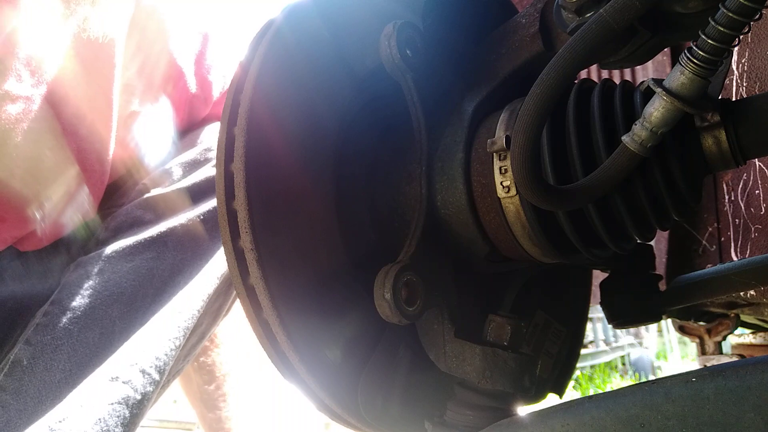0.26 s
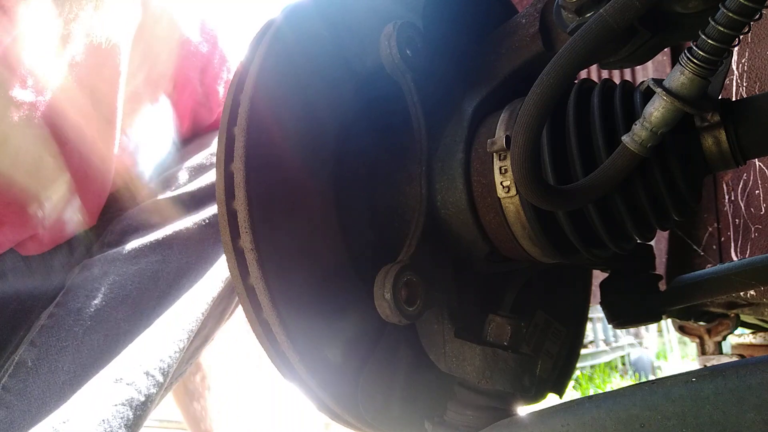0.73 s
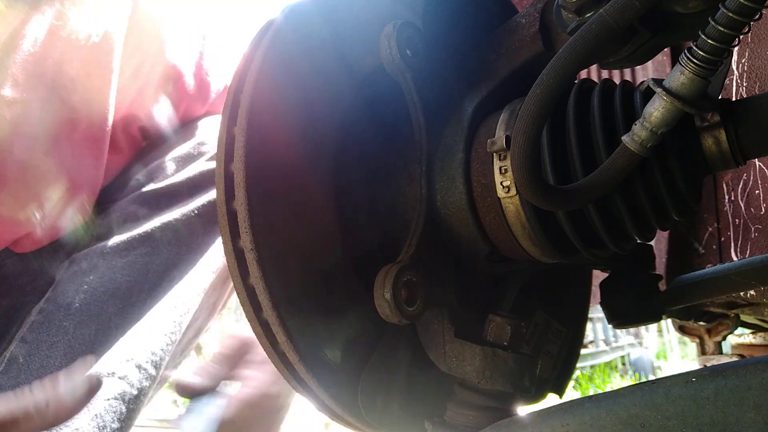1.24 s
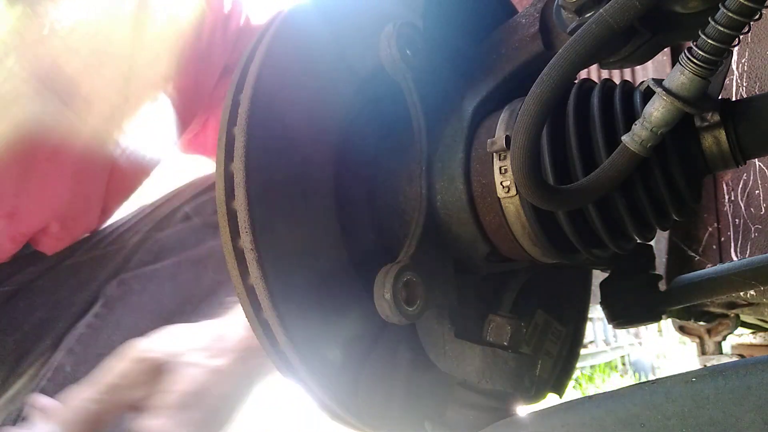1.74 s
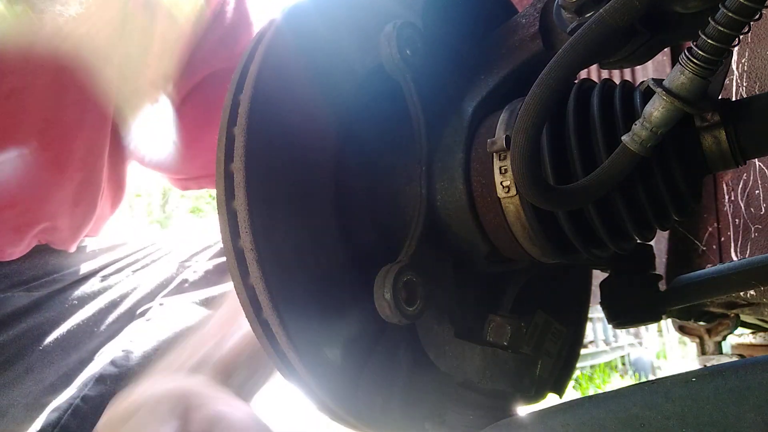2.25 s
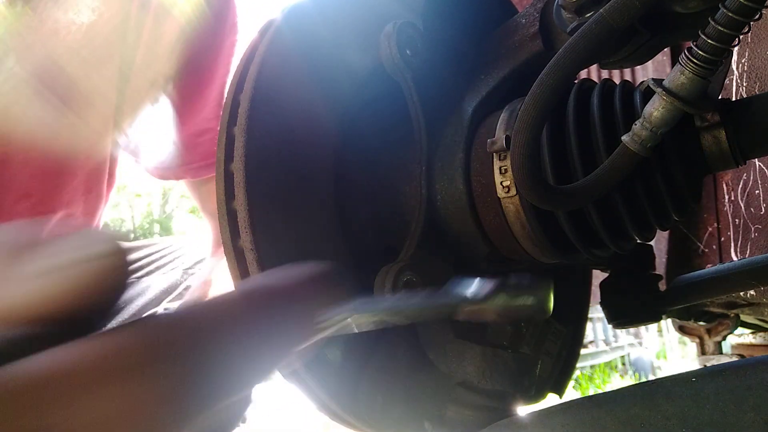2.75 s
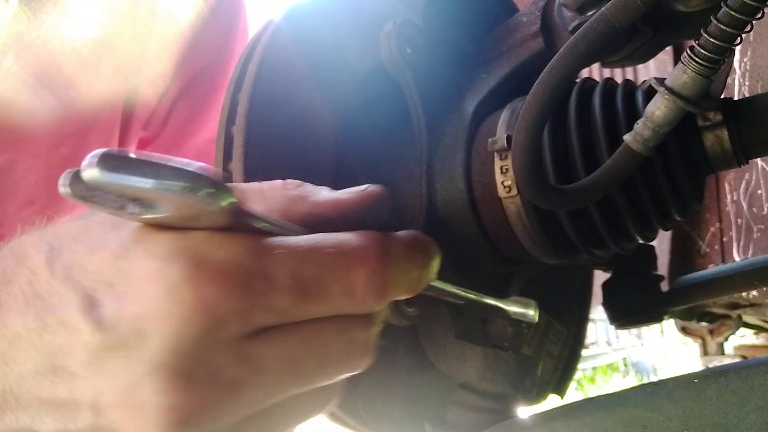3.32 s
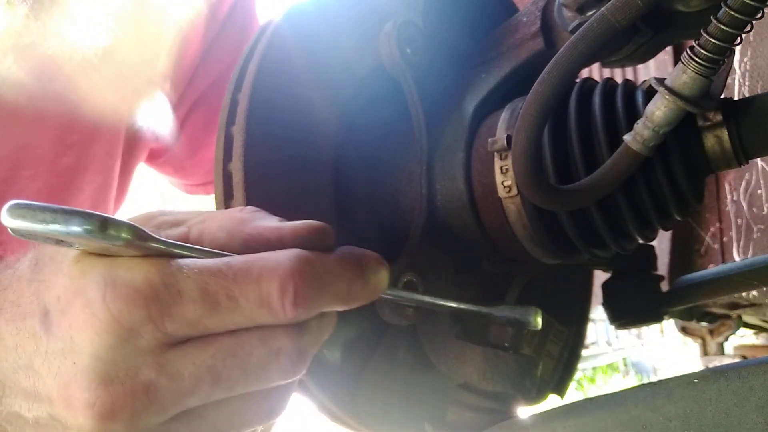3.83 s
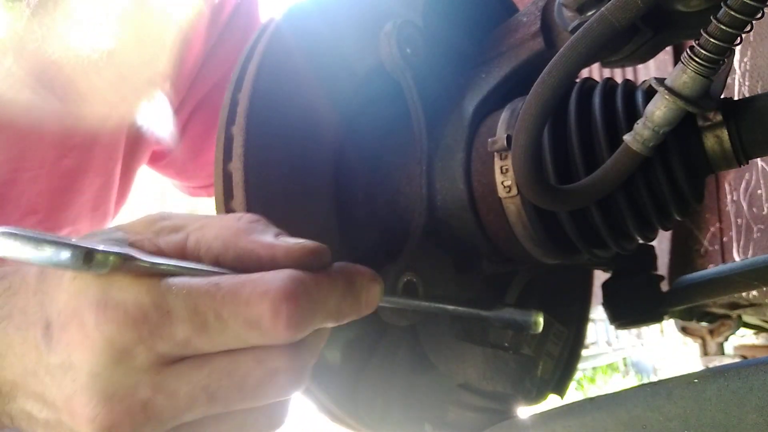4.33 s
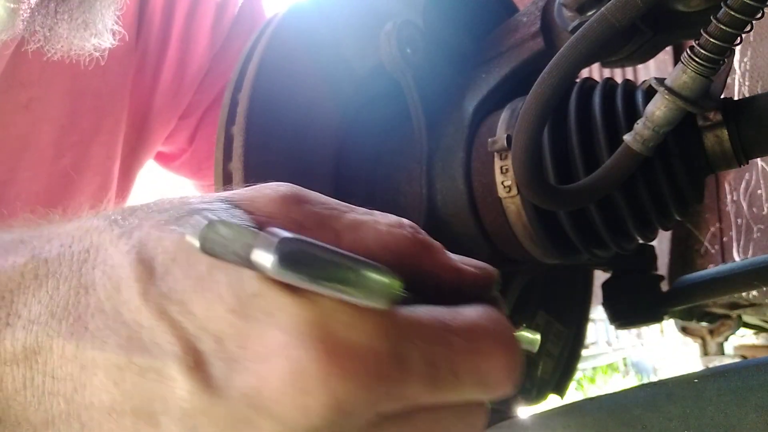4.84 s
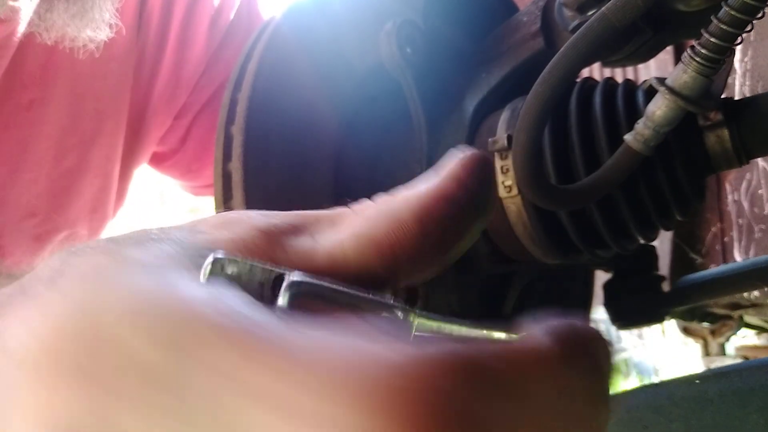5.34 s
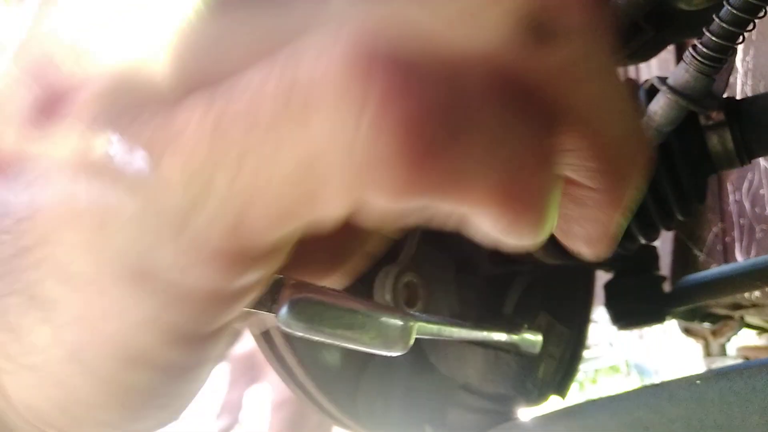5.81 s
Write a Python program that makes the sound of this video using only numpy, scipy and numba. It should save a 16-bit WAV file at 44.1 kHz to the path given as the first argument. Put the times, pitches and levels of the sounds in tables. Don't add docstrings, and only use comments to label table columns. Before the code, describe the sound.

Small tool taps and a quick ratchet whirr, then metal clanks, rasps and ringing knocks on a car hub over faint traffic and birds.

```python
import sys
import numpy as np
from scipy import signal
from scipy.fft import rfft, irfft, next_fast_len
from scipy.io import wavfile
from scipy.ndimage import uniform_filter1d
from numba import njit

SR = 44100
rng = np.random.default_rng(int(sys.argv[2]) if len(sys.argv) > 2 else 0)


def undo_db(level):
    steps = np.asarray(level, float) / 20
    return 10 ** steps


def wrap_up_sound(samples):
    columns = np.atleast_2d(samples).T
    tamed = np.clip(columns, -1, 1)
    steps = np.round(tamed * 32767).astype(np.int16)
    wavfile.write(sys.argv[1], SR, steps)


N = 267951
EARS = np.array([1, -1])
BANDS_HZ = 280 * 2 ** np.arange(0, 5.8, .5)


def colour(x, points):
    hz, db = np.transpose(points)
    size = next_fast_len(x.shape[-1])
    f = np.fft.rfftfreq(size, 1 / SR) + 1
    weight = undo_db(np.interp(np.log(f), np.log(hz), db))
    y = irfft(rfft(x, size) * weight, size)[..., :x.shape[-1]]
    return y / np.sqrt(np.mean(y ** 2))


def play(tables, silent):
    t = np.arange(N) / SR
    out = np.tile(np.array(silent, float)[:, None], N)
    for table in tables:
        s, *columns = np.transpose(table)
        on = (t >= s[0]) & (t <= s[-1])
        out[:, on] = [np.interp(t[on], s, c) for c in columns]
    return out


def held(start, end, db, attack, release, edge_db):
    full, falls = start + attack, max(end - release, start + attack)
    return [(start, db + edge_db), (full, db), (falls, db), (end, db + edge_db)]


def walk(rate):
    k = int(SR / rate)
    steps = np.repeat(rng.standard_normal(N // k + 1), k)
    return uniform_filter1d(uniform_filter1d(steps, k), k)[:N]


def grit(size, spread_db):
    return rng.standard_normal(size) * undo_db(spread_db * rng.standard_exponential(size) - spread_db)


def ports(size, alike, spread_db):
    return np.sqrt(alike) * grit(size, spread_db) + np.sqrt(1 - alike) * grit((2, size), spread_db)


def lean(hz, left_db):
    return np.interp(np.log(hz), np.log([200, 2000, 7000, 13000]), left_db)


@njit
def ring(x, pole, gain):
    out = np.zeros((2, len(x)))
    for m in range(len(pole)):
        z = 0j
        for i in range(len(x)):
            z = z * pole[m] + x[i]
            out[0, i] += (gain[0, m] * z).imag
            out[1, i] += (gain[1, m] * z).imag
    return out


HUB_LAG = -20
# f/Hz, left lead/rad, left minus right/dB
HUB_PORTS = [(764, 0.2, 3), (969, -0.1, 16), (1120, 1.4, 9), (1378, -1.1, 8), (1486, 0.6, -5),
             (1615, -2.3, 2), (1717, -0.1, 2), (1852, -1.8, 9), (1960, 1.5, 8), (1997, -2.4, 7),
             (2116, -2.2, 9), (2374, 0.2, 0), (2525, 1.3, 1), (2686, -0.5, 2), (2805, -0.2, 5),
             (3025, 0.8, 12), (3284, 0.2, 6), (3397, 1.1, 1), (3634, -2.4, 9), (4016, -1.6, 1),
             (4387, 1.2, 19), (4506, -0.1, 17), (4990, -0.7, 10), (5039, 0.8, 3), (5254, 1.1, 9),
             (5529, 2.8, 8), (5755, 0.3, 6), (7154, -0.0, 4), (1647, -1.9, 0), (1771, -0.6, -3),
             (2600, 1.7, 2), (3860, 0.3, 0), (545, 0.2, 4), (6981, -0.7, 15), (790, -0.0, 3),
             (706, -0.2, 1), (2981, 1.7, 10)]


def body(modes, left_db):
    hz, db, t60 = np.transpose(modes)
    longest = np.maximum(1.15 * (800 / hz) ** .75, 2.4 * (800 / hz) ** 2)
    t60 = np.clip(t60, .004, longest)
    turn = rng.uniform(-1, 1, len(hz)) * np.minimum(hz / 2500, .8)
    pan_db = lean(hz, left_db)
    for mode_hz, lead, mode_db in HUB_PORTS:
        turn[hz == mode_hz] = lead / 2 + np.pi * mode_hz * HUB_LAG / SR
        pan_db[hz == mode_hz] = mode_db
    paths = np.exp(1j * np.outer(EARS, turn)) * undo_db(np.outer(EARS, pan_db) / 2)
    pole = np.exp(2j * np.pi * hz / SR - np.log(1000) / (t60 * SR))
    return hz, db, pole, paths, left_db


def bands(x, part, blur_hz):
    size = next_fast_len(x.shape[-1])
    f = np.fft.rfftfreq(size, 1 / SR) + 1
    peaks = 0.25 + sum(undo_db(db) / (1 + ((f - hz) / blur_hz) ** 2) for hz, db in zip(*part[:2]))
    split = np.exp(-(np.log2(f / BANDS_HZ[:, None, None]) / .3) ** 2)
    y = irfft(rfft(x, size) * peaks * split, size)[..., :x.shape[-1]]
    return y / np.sqrt(np.mean(y ** 2, axis=(1, 2), keepdims=True))


LESSER_RING_DB = -5.5


def strike(rows, part, nodes_hz, edge_db, ring_db, hold, blur_hz, lag):
    hz, db, pole, paths, left_db = part
    out, size = np.zeros((2, N + SR)), 16384
    t = np.arange(size) / SR
    rise = np.sin(np.pi / 2 * np.minimum(t / .0008, 1)) ** 2
    hardest_db = None
    for s, peak_db, low_db, bright_db, centre_hz, t60, pan_db in sorted(rows, key=lambda row: -row[1]):
        levels_db = [low_db + edge_db[0], low_db, 0, bright_db, bright_db + edge_db[1], bright_db + edge_db[2]]

        def tilt(f):
            slope = np.interp(np.log(f), np.log(nodes_hz), levels_db)
            return slope + 5 * np.exp(-(np.log2(f / centre_hz) / 0.06) ** 2)

        fade = np.clip(0.86 * t60, .015, .15) * (2500 / BANDS_HZ[:, None]) ** 0.15
        shape = rise * undo_db(-60 * np.maximum(t - hold * fade, 0) / fade)
        weight = undo_db(tilt(BANDS_HZ)[:, None] + np.outer(lean(BANDS_HZ, left_db), EARS) / 2)
        noise = bands(ports(size, .45, 1.2), part, blur_hz)
        crash = np.sum(noise * shape[:, None] * weight[..., None], axis=0)

        blow = np.zeros(SR) + 1e-18
        blow[0] = 1
        spin = np.exp(2j * np.pi * rng.random(len(hz)))
        if hardest_db is None:
            hardest_db, spot_db = tilt(hz), 0
        else:
            spot_db = 0.5 * (tilt(hz) - hardest_db) + LESSER_RING_DB
        y = ring(blow, pole, paths * undo_db(db + spot_db + ring_db) * spin)
        y[:, :size] *= np.minimum(t / 0.00055, 1)
        y[:, :size] += crash
        y *= undo_db(peak_db - 10.0 + pan_db * EARS[:, None] / 2)

        start = int(s * SR)
        late = int(lag < 0)
        out[late, start + abs(lag):start + SR] += y[late, :SR - abs(lag)]
        out[1 - late, start:start + SR] += y[1 - late]
    return out[:, :N]


TRAFFIC_DB, AIR_DB = -47.5, -64.5
# f/Hz, level/dB per Hz
TRAFFIC = [(12, -38), (20, 3), (32, -12), (93, -1), (163, -16), (187, -21), (239, -21), (316, -26),
           (363, -23.5), (440, -31), (613, -32), (658, -33.5), (1300, -55), (1690, -93.5), (2860, -120)]
# f/Hz, level/dB per Hz
AIR = [(590, -12), (1000, -10.5), (1570, -14.5), (3380, -12.5), (3840, -16.5), (4520, -16), (5250, -20.5),
       (7270, -12), (16000, -48)]
# t/s, level/dB
PASSING = [
    (0.0, -50.5),
    (1.2, -54),
    (1.5, -47.5),
    (2.9, -50),
    (3.9, -56),
    (5.0, -47),
    (5.83, -42),
    (6.07, -50),
]


def yard():
    mid, side = rng.standard_normal((2, N))
    side_points = [(20, -1.0), (60, -10.5), (125, -17.0), (250, -8.0), (600, -6.5), (20000, -1.5)]
    side = colour(side, side_points) * undo_db(-2.5)
    swell_db = np.interp(np.arange(N) / SR, *np.transpose(PASSING))
    rumble_db = TRAFFIC_DB + 0.17 * (swell_db - swell_db.mean())
    rumble = colour(mid + np.outer(EARS, side), TRAFFIC) * undo_db(rumble_db)
    return rumble + colour(rng.standard_normal((2, N)), AIR) * undo_db(AIR_DB + walk(2.2))


def bird(calls, wobble_hz):
    hz = play([[(a, first_hz), (b, last_hz)] for a, b, first_hz, last_hz, _ in calls], [3000])[0]
    db = play([held(a, b, db, .017, .012, -13) for a, b, *_, db in calls], [-200])[0]
    phase = [np.cumsum(hz + wobble_hz * walk(540)) * 2 * np.pi / SR for _ in EARS]
    return np.sqrt(2) * uniform_filter1d(undo_db(db), size=200) * undo_db(2.1 * walk(63)) * np.sin(phase)


# start t/s, end t/s, first f/Hz, last f/Hz, level/dB
HIGH_BIRD = [
    (0.735, 0.8, 7400, 7850, -88),
    (0.795, 0.86, 7840, 7730, -82),
    (0.89, 0.96, 7500, 7520, -77.5),
    (2.195, 2.25, 7350, 7540, -82),
    (2.585, 2.65, 7440, 7200, -84),
    (2.68, 2.74, 6800, 6850, -84.5),
    (3.71, 3.845, 7300, 7600, -87),
    (3.855, 3.92, 7800, 7570, -84),
    (4.99, 5.14, 7120, 6970, -81.5),
]
LOW_BIRD = [
    (5.17, 5.28, 3420, 3310, -80),
    (5.29, 5.35, 3250, 2700, -79.5),
]


def birds():
    return bird(HIGH_BIRD, 180) * undo_db(20.0) + bird(LOW_BIRD, 40.83) * undo_db(14)


# start t/s, end t/s, level/dB
RUBS = [
    (0.57, 0.678, -64),
    (1.348, 1.53, -53),
    (2.532, 2.578, -58),
    (3.87, 3.927, -63.5),
]
# f/Hz, level/dB per Hz
RUB = [(710, -58), (1200, -20), (1430, -19), (2680, -5.5), (3090, 2), (3910, -3.5), (7710, -0.5),
       (14000, -35)]


def rubs():
    level_db = play([held(*row, attack=.028, release=.014, edge_db=-12.5) for row in RUBS], [-200])
    hiss = colour(rng.standard_normal((2, N)), RUB) * undo_db(level_db + 1.5 * walk(70) + 2.5 * EARS[:, None])
    t = np.arange(N) / SR - .64
    return hiss + undo_db(-34.5) * np.exp(-(t / 0.005) ** 2) * np.sin(2 * np.pi * 125 * t)


# t/s, level/dB, low/dB, bright/dB, crash t60/s
CLINKS = [(0.355, -54, -19, -1, .11), (0.378, -53, -14, -13, 0.099), (0.395, -50, -20, -21, 0.099),
          (0.583, -33.5, -6, -9, 0.075), (0.5875, -34.5, -10.5, -12, 0.037), (0.599, -45, -0.5, -18, 0.14),
          (0.6144, -40, -11, -13, 0.069), (0.622, -41, -14, -8, .08), (0.7496, -36, -12, -13.5, 0.037),
          (0.7545, -40, -12, -20, 0.043), (0.762, -51, -19, -8, 0.077), (0.7722, -41, -9, -12, 0.031),
          (0.7755, -44.5, -23, -12, 0.047), (0.797, -55, -24, -4, 0.12)]
# f/Hz, level/dB, t60/s
TOOL = [(590, 16, 0.023), (1820, -1, .06), (3110, 11, 0.043), (5103, 2.5, 0.053), (7120, 4.5, 0.018)]


def clinks():
    rows = [(s, peak_db, low_db, bright_db, 2220, t60, 0) for s, peak_db, low_db, bright_db, t60 in CLINKS]
    nodes_hz = [250, 650, 2500, 7000, 11500, 16500]
    tool = body(TOOL, [.1, 1.0, 1.8, 0.091])
    return strike(rows, tool, nodes_hz, [-3, -9, -25], -1.1, 0.048, 680, lag=0) * undo_db(-5.0)


HEAD_HZ, HEAD_SAG_HZ_PER_S, HEAD_REST_HZ, HEAD_FREE_HZ, BENDS_UNDER_HZ = 3580, 5500, 3080, 3260, 4000
TICK_LATE_S, TICK_T60_S = 0.0019, 0.017
# f/Hz, level/dB per Hz
TICK = [(250, -21), (600, -1.5), (2000, 0), (5000, -23)]
# f/Hz, level/dB, t60/s
RATCHET = [(2850, -6, .025), (3170, 1, .03), (3400, 1, .028), (4430, -20, .02), (5980, -9, .025),
           (6800, 0, .028), (7350, -1, .025), (8600, -8, .02), (9400, -9, .018), (11300, -17, .015),
           (14500, -22, .02)]
# t/s, level/dB, tick level/dB, bright/dB
CLICKS = [(1.733, -32, -38, 5.5), (1.7493, -22.5, -25, -1), (1.7653, -20, -23, 1.5),
          (1.7799, -23.5, -25, 9), (1.7965, -21.5, -28.5, 1.5), (1.812, -25.5, -33.5, 12.5),
          (1.8291, -24, -21, 8.5), (1.8325, -30, -30.5, 8), (1.8442, -25, -15.5, 13.5),
          (1.865, -28.5, -11, 17.5), (1.979, -50.5, -23, -18)]


def ratchet():
    clicks, t = 0, np.arange(N) / SR
    tick = colour(rng.standard_normal(N), TICK)
    nodes_hz = [250, 2100, 2900, 7700, 12000, 16500]
    for s, peak_db, tick_db, bright_db in CLICKS:
        pitch = max(HEAD_HZ - HEAD_SAG_HZ_PER_S * (s - CLICKS[0][0]), HEAD_REST_HZ)
        head = []
        for hz, db, t60 in RATCHET:
            bent_hz = hz * pitch / HEAD_FREE_HZ if hz < BENDS_UNDER_HZ else hz
            upper_db = .4 * bright_db * (hz > 5000)
            head.append((bent_hz, db + upper_db, t60))
        row = (s, peak_db, -28, bright_db, pitch, .036, -7.5)
        clicks = clicks + strike([row], body(head, [-2.0, -3.5, 16, -6.5]), nodes_hz,
                                 [-1.5, -11, -28], 3.6, 0.059, 180, lag=42)
        fall_db = -60 * np.abs(t - s) / TICK_T60_S
        clicks += (t > s + TICK_LATE_S) * tick * undo_db(peak_db + tick_db + 7.5 + fall_db)
    return clicks * undo_db(2.5)


THUD_DB, THUD_HZ, THUD_T60_S = -22.5, 96, 0.32


def thuds():
    t, level = np.arange(N) / SR, 0
    for s, db, *_ in KNOCKS + CLANKS + CHATTER + SEATING:
        level = level + (t > s) * undo_db(db + THUD_DB - 60 * np.abs(t - s) / THUD_T60_S)
    boom = [(THUD_HZ / 4, -20), (THUD_HZ, 0), (THUD_HZ * 4, -24), (THUD_HZ * 16, -60)]
    return level * colour(rng.standard_normal(N), boom)


# f/Hz, level/dB (unused: SPOTS sets it for each spot struck), t60/s
HUB = [(764, -15, 0.9), (969, -4, 0.46), (1120, -7, 0.23), (1378, -15, 2.2), (1486, -4, 0.76),
       (1615, -16, 0.38), (1717, 0, 0.23), (1852, -10, 0.36), (1960, -8, 0.32), (1997, -7, 0.26),
       (2116, -4, 0.31), (2374, -11, 0.38), (2525, -5, 0.45), (2686, -10, 0.32), (2805, -5, 0.21),
       (3025, 0, 0.12), (3284, -15, 0.31), (3397, -15, 0.52), (3634, -11, 0.2), (4016, -12, 0.31),
       (4387, -6, 0.2), (4506, -10, 0.2), (4990, -15, 0.28), (5039, -17, 0.27), (5254, -15, 0.31),
       (5529, -10, 0.14), (5755, -18, 0.26), (7154, -22, 0.3),
       (1647, -10, .08), (1771, -4, .12), (2600, -10, .12), (3860, -14, .15), (545, -12, .15),
            (6981, -14, .07), (790, -15, 1.1), (706, -13, .55), (2981, -8, .16)]
# f/Hz, plate/dB, socket/dB, rim/dB, bolt/dB
SPOTS = [(764, -28, -34, -15, -21), (969, -25, -40, -6, -11), (1120, -12, -19, -1, -10),
         (1378, -26, -34, -13, -17), (1486, -8, -24, -11, -6), (1615, -13, -26, -7, -13),
         (1717, 0, -29, 4, -3), (1852, -17, -26, -5, -10), (1960, -8, -17, -9, -14), (1997, -6, -34, 1, -9),
         (2116, -1, -28, -4, -7), (2374, -18, -44, -16, -6), (2525, -10, -35, -5, -1),
         (2686, -9, -27, -15, -13), (2805, -6, -15, -12, 0), (3025, -10, -23, -23, -1),
         (3284, -15, -29, -16, -19), (3397, -12, -27, -18, -21), (3634, -8, -6, -17, -16),
         (4016, -8, -17, -8, -17), (4387, -12, -28, -12, -11), (4506, -28, -31, -14, -4),
         (4990, -21, -28, -13, -21), (5039, -14, -17, -16, -24), (5254, -15, -26, -14, -31),
         (5529, -8, -28, -25, -25), (5755, -16, -50, -31, -35), (7154, -17, -33, -26, -34),
         (1647, -17, -13, -16, -7), (1771, -9, -8, -2, -2), (2600, -9, -27, -12, -4),
         (3860, -25, -24, -20, -17), (545, -17, -9, -14, -3), (6981, -36, -41, -38, -21),
         (790, -29, -41, -19, -18), (706, -25, -22, -13, -12), (2981, -7, -16, -12, -15)]


def spot(axis):
    return [(hz, row[axis], t60) for (hz, _, t60), row in zip(HUB, SPOTS)]


# f/Hz, level/dB, t60/s
DISC = [(801, -13, 2.2), (930, -21.5, 0.5), (305, -9, 0.22), (466, -29, 0.16)]


def rim():
    return body(spot(axis=3) + DISC, [0.0, 4, 10.5, -14.0])


def bolt():
    return body(spot(axis=4) + DISC, [-3.5, 5.5, 13, -12.0])


HUB_NODES_HZ = [250, 650, 2500, 7000, 10500, 13500]
FREE_T60_S, MUFFLED_T60_S, MUFFLED_OVER_DB = 0.16, 0.088, 15


def centred(rows):
    return [(*row, MUFFLED_T60_S if row[2] > MUFFLED_OVER_DB else FREE_T60_S, 0) for row in rows]


TOUCH_DB, LIFT_DB, SCRAPE_BRIGHT_DB = -13, -19, -14.5
SCRAPE_RING_DB = -61
# start t/s, hardest t/s, end t/s, level/dB, low/dB
SCRAPES = [
    (3.112, 3.148, 3.27, -52, -9.5),
    (3.163, 3.206, 3.254, -39, -2.5),
    (3.293, 3.319, 3.31, -56.5, -7),
    (4.457, 4.516, 4.5, -57.5, 10),
    (4.592, 4.64, 4.648, -41, 3),
    (4.95, 5.02, 5.08, -47, -1),
    (5.148, 5.169, 5.53, -66, -8),
]


def scrapes():
    strokes = []
    for start, top, end, db, low in SCRAPES:
        strokes.append([(start, db + TOUCH_DB, low), (top, db, low), (end, db + LIFT_DB, low)])
    level_db, low_db = play(strokes, [-200, 0])
    part = bolt()
    hz, db, pole, paths, left_db = part
    slips = bands(ports(N, .3, 2.2), part, 80) * undo_db(level_db + 2.5 * walk(120))

    octave, nodes = np.log(BANDS_HZ), np.log([650, 2500, 7000])
    low = np.interp(octave, nodes, [0.86, 0.064, 0.046])[:, None]
    bright = np.interp(octave, nodes, [0.035, 0.021, 0.6])[:, None]
    roll_db = np.interp(BANDS_HZ, [300, 600, 1500, 3000, 8000, 14000], [-19.5, -3.5, -8.5, -4, -2.5, -44])
    tilt_db = low * low_db + bright * SCRAPE_BRIGHT_DB + roll_db[:, None]
    weight = undo_db(tilt_db[:, None] + np.outer(lean(BANDS_HZ, left_db), EARS)[..., None] / 2)
    scrape = np.sum(slips * weight, axis=0)
    return scrape * undo_db(-3.0) + ring(scrape[0] + 1e-18, pole, paths * undo_db(db + SCRAPE_RING_DB))


# t/s, level/dB, low/dB, bright/dB, crash centre f/Hz
SEATING = [
    (3.4465, -39.5, -6, 6.5, 3170),
]
# f/Hz, level/dB, t60/s
SOCKET = [(801, -34, 1.5), (3500, -5, 0.1), (4210, -16, 0.22), (4600, -12, 0.1), (8000, -6, 0.1),
          (8390, -14, 0.092)]


def seating():
    socket = body(SOCKET + spot(axis=2), [2.4, 2.9, 11.0, 11.0])
    return strike(centred(SEATING), socket, HUB_NODES_HZ, [-4, -12, -45], 17.0, 0.092, 75, lag=HUB_LAG)


RESTS_S, RESTING_T60_S = 3.125, .6
# t/s, level/dB, low/dB, bright/dB, crash centre f/Hz
CLANKS = [
    (2.9074, -24, -10, -4, 2730),
    (2.9405, -25.5, -15, 3, 6975),
    (2.9594, -35, -14, -14, 2950),
]
CHATTER = [
    (3.1248, -49.5, 2, -20, 1490),
    (3.147, -55, -5.5, -16, 2900),
    (3.1846, -42.5, -33, -18, 3175),
    (3.1976, -46, -3, -18, 3450),
    (3.2061, -38, -12, -6, 3130),
    (3.2256, -41.5, -36, -18, 2950),
    (3.241, -54, 5.5, -30, 2900),
    (3.3055, -54, 5, -17.5, 1483),
]
# f/Hz, level/dB, t60/s
PLATE = [(2700, -4.5, .08), (3650, -2, 0.0702), (5800, -10.5, .1), (794, -12, .12), (802, -28, 1.5),
         (2450, -5.5, 0.064), (3560, -4, .06), (4455, 0.5, .08), (5390, 2.5, .06), (5480, -5, .06),
         (6975, 1.5, 0.04), (7120, -8, 0.0622)]


def clanks():
    plate = body(spot(axis=1) + PLATE, [1.0, 4.0, 12, -9.5])
    edge_db = [-4, -20, -50]
    resting = undo_db(-60 * np.maximum(np.arange(N) / SR - RESTS_S, 0) / RESTING_T60_S)
    blows = resting * strike(centred(CLANKS), plate, HUB_NODES_HZ, edge_db, 0.101, 0.11, 50, lag=HUB_LAG)
    return blows + strike(centred(CHATTER), plate, HUB_NODES_HZ, edge_db, 0.086, 0.072, 77, lag=HUB_LAG)


RIM_UNTIL_S = 4.56
# t/s, level/dB, low/dB, bright/dB, crash centre f/Hz
KNOCKS = [(3.6412, -77, 30.5, -6, 1813), (3.7203, -70, 20.5, -10, 1844), (4.1364, -67.5, 19.5, 2.5, 1810),
          (4.1946, -26.5, -4, -18.5, 1634), (4.2199, -32.5, -10.5, -26, 1700),
          (4.4268, -45.5, 3, -37, 1450), (4.4382, -46.5, 6.5, -60, 2390), (4.5011, -58, -2, -17, 4500),
          (4.578, -50, 1.5, -26, 1610), (4.6427, -29.5, -10.5, -12.5, 2600), (4.9619, -59, -12, 0, 5750),
          (4.975, -61, -10, -2, 4500), (4.993, -61, -8, 0.5, 4500), (5.012, -61, 3, -4, 1120),
          (5.1612, -61, -25.5, 7, 2220)]


def knocks():
    on_rim = centred([row for row in KNOCKS if row[0] < RIM_UNTIL_S])
    on_bolt = centred([row for row in KNOCKS if row[0] > RIM_UNTIL_S])
    edge_db = [-4, -16, -40]
    blows = strike(on_rim, rim(), HUB_NODES_HZ, edge_db, 0.1, 0.074, 33, lag=HUB_LAG)
    return blows + strike(on_bolt, bolt(), HUB_NODES_HZ, edge_db, 0.1, 0.087, 24, lag=HUB_LAG)


def scene():
    far = yard() + birds()
    tool = rubs() + clinks() + ratchet()
    return far + tool + thuds() + scrapes() + seating() + clanks() + knocks()


def band_limit(x):
    return signal.sosfilt(signal.butter(12, 16470, fs=SR, output="sos"), x)


GATE_SHUT_DB, GATE_HZ, GATE_SLEW_S, TOP_HZ = -19, 800, 0.0065, 15900
# opens t/s, shuts t/s, level/dB; later rows win
GATE = [(1.208, 1.218, -13), (1.64, 1.65, -14), (2.812, 2.822, -13), (1.248, 1.293, -13.5),
        (0.347, 0.372, -9.5), (0.378, 0.417, -9.5), (0.568, 0.678, -0.5), (0.735, 0.849, -1.5),
        (0.919, 0.938, -8), (1.334, 1.542, -7), (1.728, 1.941, -0.5), (1.983, 1.994, -8.5),
        (2.203, 2.227, -11.5), (2.52, 2.574, -7), (2.586, 2.625, -8.5), (2.683, 2.734, -4.5),
        (2.908, 3.343, -0.5), (3.435, 3.571, 1.5), (3.718, 3.73, -8), (3.798, 3.815, -12),
        (3.866, 3.919, -5.5), (4.139, 4.142, -0.5), (4.198, 4.416, 0.4), (4.416, 4.429, -5),
        (4.434, 4.546, 2.5), (4.555, 4.58, -1), (4.57, 4.813, 0.3), (4.958, 5.132, -3), (5.156, 5.2, -7.5),
        (5.213, 5.236, -10.5), (5.251, 5.267, -7), (5.303, 5.329, -12.5), (5.477, 5.519, -7.5)]


def record(dry):
    db = play([[(a, db), (b, db)] for a, b, db in GATE], [GATE_SHUT_DB])[0]
    gain = undo_db(uniform_filter1d(db, int(GATE_SLEW_S * SR) + 1))
    bass = signal.sosfiltfilt(signal.butter(2, GATE_HZ, fs=SR, output="sos"), dry, padlen=SR // 10)
    gated = bass + gain * (dry - bass)
    heard = signal.sosfilt(signal.butter(8, TOP_HZ, fs=SR, output="sos"), gated)
    return band_limit(heard)


dry = scene()
out = record(dry)
wrap_up_sound(out)
```